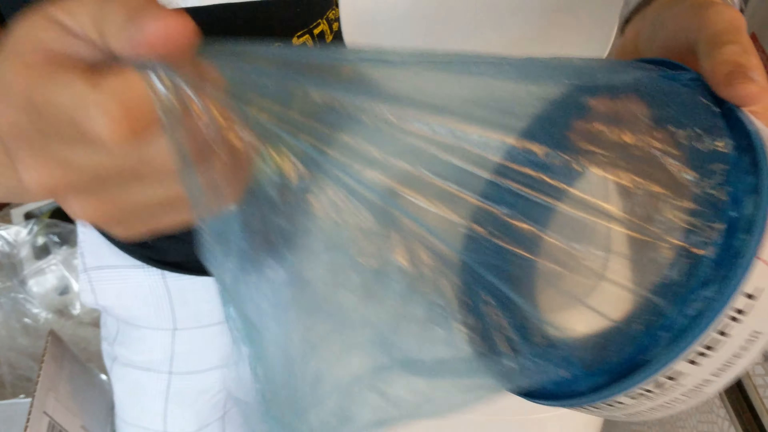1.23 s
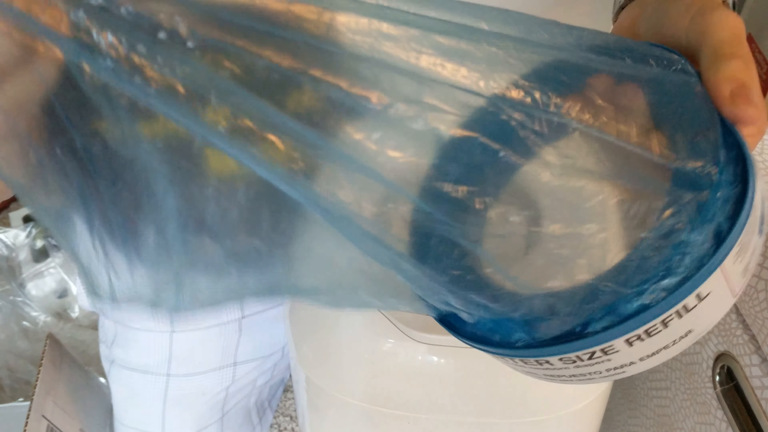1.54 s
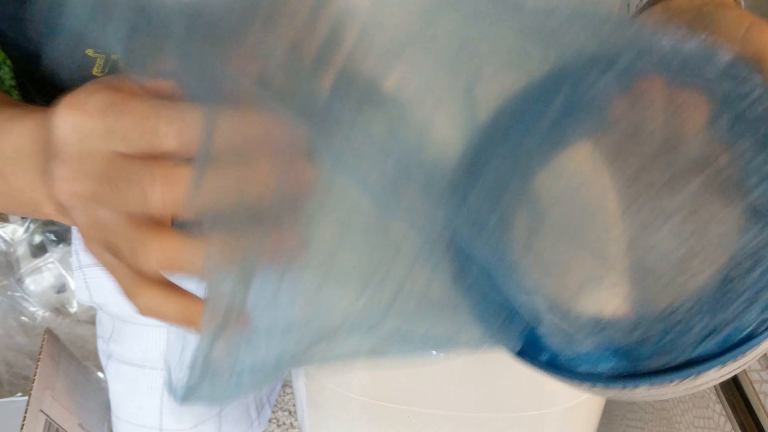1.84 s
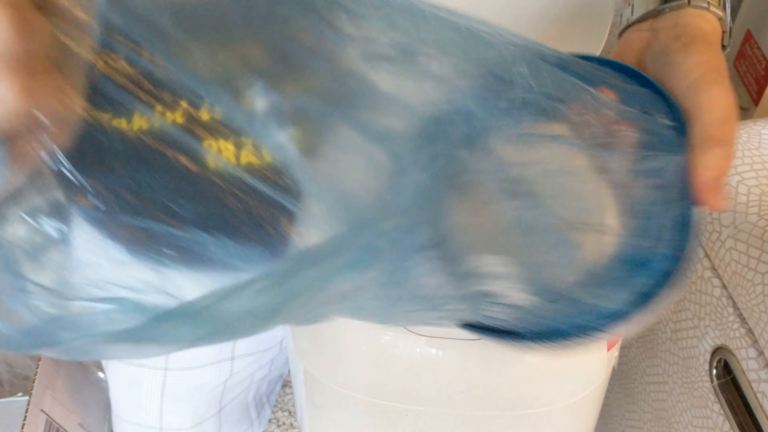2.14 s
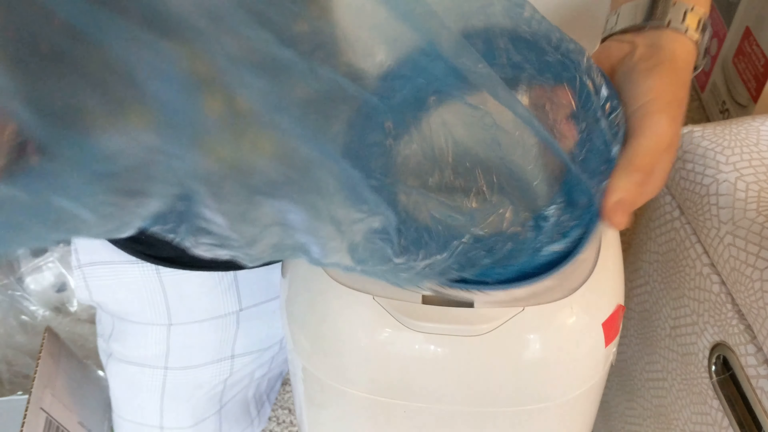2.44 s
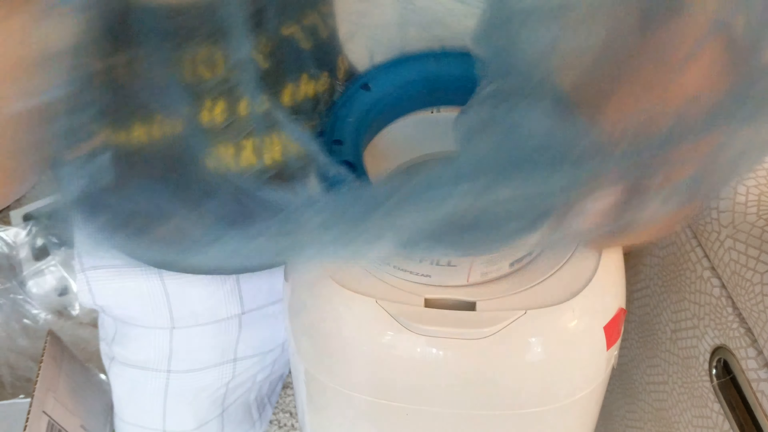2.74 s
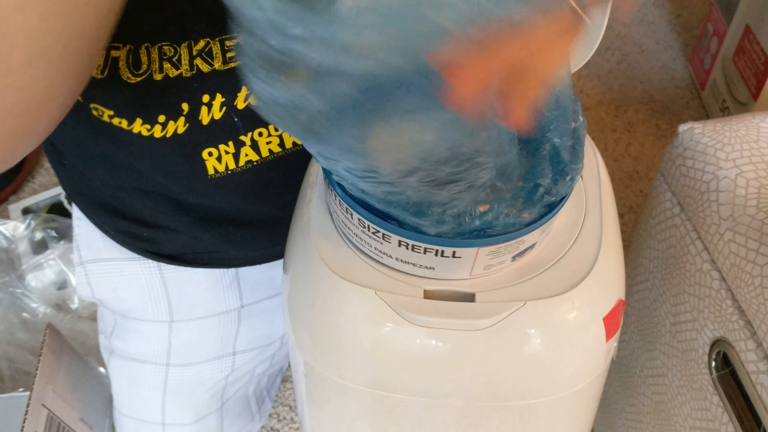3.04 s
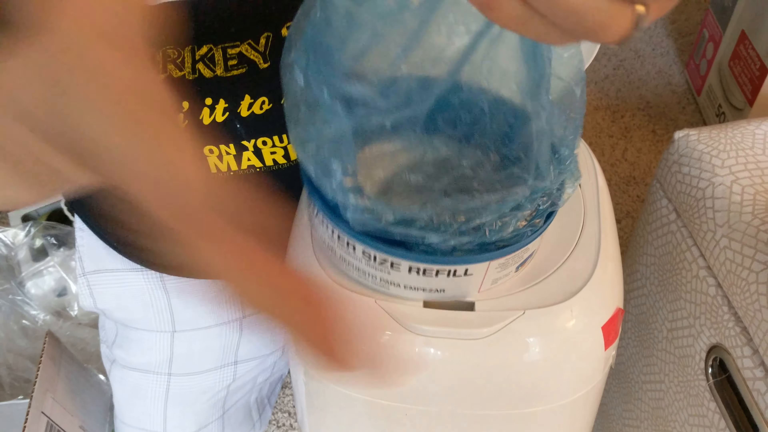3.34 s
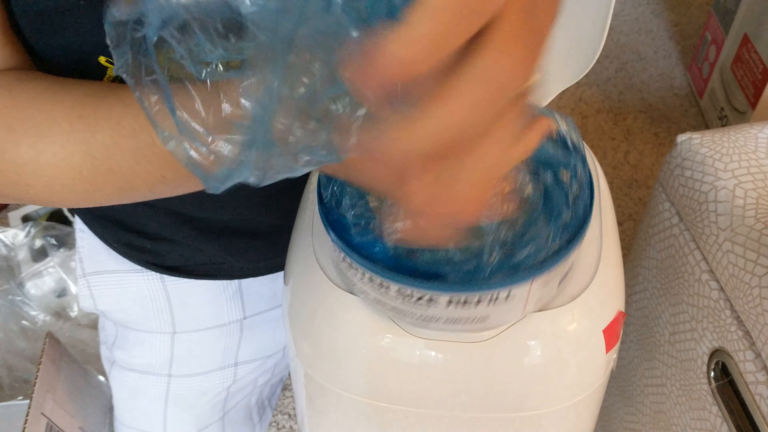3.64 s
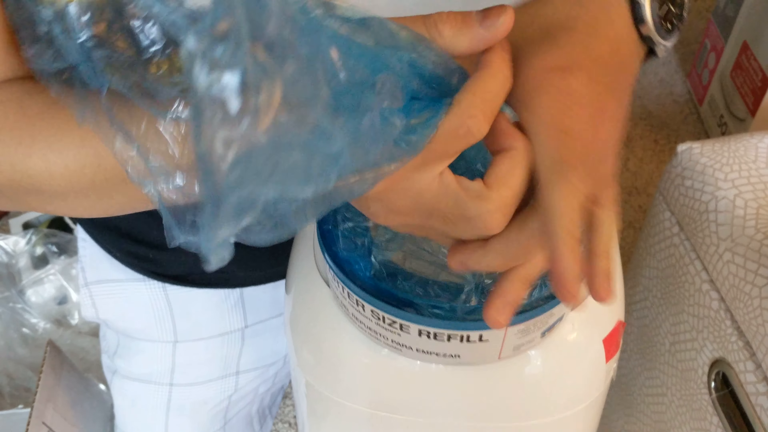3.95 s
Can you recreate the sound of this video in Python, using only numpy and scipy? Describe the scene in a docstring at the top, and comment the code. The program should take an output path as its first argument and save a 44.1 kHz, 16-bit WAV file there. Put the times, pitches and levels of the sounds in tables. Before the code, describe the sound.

A thin plastic bag crinkles and rustles in repeated tugs, close to the microphone in a small, quiet room. Creases snap now and then, and later a hard ring knocks a few times on a plastic pail.

```python
"""Thin plastic film crinkles as it is pulled from a bag refill ring, several times, close by in a small room.
The film buckles in thousands of tiny clicks, more of them the harder it is pulled, and flaps a little air
about. Now and then a stiff crease snaps. The hard ring knocks and scrapes in the hand and against a
plastic pail, whose hollow body thuds softly."""
import sys
import numpy as np
from scipy import signal
from scipy.io import wavfile
from scipy.ndimage import uniform_filter1d

SR = 44100
rng = np.random.default_rng(int(sys.argv[2]) if len(sys.argv) > 2 else 0)


def materialize(psi):
    """Save the field psi as 16-bit PCM at rate SR to the path in sys.argv[1].

    A 1-D psi becomes a single channel; in a 2-D psi each row is a channel.
    """
    bounded = np.clip(np.atleast_2d(psi).T, -1, 1)
    quanta = np.round(bounded * 32767).astype(np.int16)
    wavfile.write(sys.argv[1], SR, quanta)


N = 176400
TIME = np.arange(N) / SR
HALF_SECOND = SR // 2


def crinkle():
    """Pulled film buckles in clumps of tiny clicks, over the smooth hiss of sliding."""
    # How loud the film's crinkling is as it swells and fades: time_s, treble_db, middle_db
    loudness = [
        [(0.02, -52, -50), (0.036, -50, -48.5), (0.096, -48, -53), (0.1, -44.5, -49), (0.182, -34, -34),
         (0.19, -38.5, -40.5), (0.23, -38.5, -39.5)],
        [(0.24, -35.5, -48), (0.264, -36, -34), (0.272, -36.5, -43), (0.322, -32.5, -34), (0.38, -34.5, -43),
         (0.41, -38, -38), (0.435, -46, -54)],
        [(0.45, -41, -46.5), (0.516, -49.5, -49.5), (0.548, -52, -57.5), (0.646, -58.5, -62), (0.654, -52, -54),
         (0.66, -57.5, -61), (0.775, -64, -71)],
        [(0.785, -62.5, -62), (0.799, -49.5, -48), (0.837, -50, -58.5), (0.879, -44, -45.5),
         (1.003, -33.5, -36.5), (1.137, -38, -40), (1.16, -44, -46.5)],
        [(1.166, -36, -39.5), (1.188, -27.5, -30), (1.208, -38.5, -39), (1.232, -35.5, -44.5),
         (1.32, -43, -42.5)],
        [(1.335, -39, -38), (1.345, -39.5, -40), (1.359, -36.5, -45), (1.365, -33.5, -32.5),
         (1.433, -31.5, -34), (1.517, -42.5, -48), (1.542, -50, -53)],
        [(1.552, -41, -44.5), (1.608, -40, -42.5), (1.734, -46, -50.5), (1.74, -53, -63), (1.794, -47.5, -52),
         (1.8, -77, -71), (1.82, -74, -88)],
        [(1.86, -63, -61.5), (1.91, -51, -47), (1.928, -46, -50), (1.934, -44.5, -45.5), (2.052, -33, -34.5),
         (2.068, -35.5, -37.5), (2.132, -32, -34.5)],
        [(2.19, -43.5, -40.5), (2.216, -40, -44.5), (2.37, -30.5, -34), (2.444, -34.5, -38),
         (2.49, -45.5, -49.5), (2.506, -41.5, -44.5), (2.55, -53.5, -52)],
        [(2.59, -49, -42), (2.662, -50, -50.5), (2.704, -43, -49.5), (2.716, -41, -42.5), (2.758, -39, -47.5),
         (2.798, -50.5, -50), (2.845, -46.5, -49)],
        [(2.975, -68.5, -54.5), (3.021, -55, -64), (3.027, -52.5, -53), (3.065, -36, -50), (3.079, -49, -47),
         (3.091, -36.5, -43.5), (3.11, -41.5, -47.5)],
        [(3.13, -35.5, -39.5), (3.168, -36, -43), (3.176, -39.5, -37.5), (3.214, -37.5, -41.5),
         (3.23, -35.5, -40.5), (3.362, -44, -53), (3.385, -45, -58)],
        [(3.43, -44, -46), (3.446, -41.5, -54), (3.476, -39, -40.5), (3.55, -37, -38.5), (3.675, -42.5, -44.5)],
        [(3.785, -51.5, -49), (3.865, -49, -54.5), (3.889, -59, -50), (3.893, -52, -58), (3.951, -54, -55),
         (3.959, -49.5, -56), (4.0, -46, -46)],
    ]
    # The film's tone, from low to high: pitch_hz, level_db
    film_tone = [(150,-8),(260,-9),(400,-6),(600,-4.5),(820,-3),(1050,-2.5),(1400,-2.5),(1700,-1.5),(2300,-0.5),(3400,-1.6),(5000,-2.5),(8500,-6.5),(13000,-7.5),(16000,-8.5)]
    treble_db, middle_db = curves_over_time(loudness)
    full_pull_db, full_pull_clicks_per_s = -33, 9000
    chance = np.clip(full_pull_clicks_per_s * from_db(.8 * (treble_db - full_pull_db)) / SR, 1e-4, 1)
    happens = rng.random(N) < chance
    size_db = 2.5 * np.minimum(rng.exponential(1, N), 4.5)
    clump_db = 2.5 * drift(rate_hz=33)
    buckles = happens * from_db(size_db + clump_db) * rng.choice([-1, 1], N) / np.sqrt(chance)
    buckles /= np.sqrt(uniform_filter1d(buckles ** 2, size=1000) + 1e-2)   # even out the loudness
    out, power = np.zeros(N), 0
    for edges, hz in bands()[6:]:   # skip the deep bass
        colour_db = 4.5 * np.clip(rng.standard_normal(N), -2, 2)   # each click gets its own tone
        clicks = rms_one(buckles * from_db(colour_db))
        shivering = from_db(.5) * shiver(clicks, fade_s=.01)
        sliding = .49 * rng.standard_normal(N)
        sheet = rms_one(filtered(clicks + shivering + sliding, edges, "band"))
        treble_share = at_hz([(1370, 0), (7100, 1)], hz)
        level_db = treble_share * (treble_db + 2) + (1 - treble_share) * (middle_db + 4.5)
        gain = from_db(at_hz(film_tone, hz)) * np.sqrt(hz)
        out = gain * from_db(level_db) * sheet - out   # flipping the sign joins the bands without dips
        power += gain ** 2
    return out / np.sqrt(power)


def shiver(clicks, fade_s):
    """The sheet shivers after each click, making a short burst of fading noise."""
    energy_kept = from_db(-120 / (fade_s * SR))
    energy = signal.lfilter([1 - energy_kept], [1, -energy_kept], clicks ** 2 + 1e-18)
    return np.sqrt(energy) * rng.standard_normal(N)


def crease_snaps():
    """A stiff crease flips over with a click and a very short flutter."""
    # Single creases snapping: start_s, level_db, pitch_hz
    creases = [(.0355,-30,5000),(.128,-36,4000),(0.26,-17,3500),(.298,-18,2980),(.3235,-14,4440),(0.559,-33,6000),(0.615,-32.5,7000),(0.632,-39,7000),(.6535,-34.5,7000),(.674,-42,7040),(0.791,-34,7000),(0.805,-32,7000),(0.8035,-24.5,6000),(0.845,-26,5000),(0.886,-20,2000),(.917,-22,5000),(.947,-35,4000),(1.108,-26,4000),(1.169,-24,3500),(1.186,-32,3500),(1.333,-25,4000),(1.367,-32,2500),(1.3934,-16,3500),(1.425,-21,3000),(1.553,-28,6000),(1.727,-19.5,4900),(1.7905,-31,4900),(1.807,-28,3900),(1.8475,-27.5,12000),(1.8485,-24.5,9000),(1.937,-24,4960),(2.135,-18,4900),(2.581,-23,6000),(2.6665,-26.5,5970),(2.961,-32.5,4940),(3.026,-26.5,8000),(3.04,-26,6000),(3.123,-14,7000),(3.726,-17,5800),(3.7274,-24,7000),(3.779,-28,5500),(3.825,-34,5000),(3.98,-32,5000)]
    out = np.zeros(N)
    for start_s, level_db, hz in creases:
        flutter = from_db(1.5) * fading_noise(fade_s=.012)
        snap = filtered(signal.unit_impulse(HALF_SECOND) + flutter, [hz / 2, hz * 2], "band", order=1)
        add(out, start_s, from_db(level_db - 1.5) * snap / np.abs(snap).max())
    return out


def ring_hollow(film):
    """The hollow of the ring colours the sound of the tight film, until the film goes slack."""
    # Pitches the hollow makes louder or softer: pitch_hz, width_hz, boost_db
    resonances = [(302,52,-2.5),(585,160,3.5),(754,110,-2),(960,240,-0.5),(1200,200,-3),(1420,180,6.5),(1660,140,-1),(3330,1100,2)]
    tight = film
    for hz, width_hz, boost_db in resonances:
        b, a = signal.iirpeak(hz, hz / width_hz * from_db(boost_db / 2), fs=SR)
        tight = tight + (from_db(boost_db) - 1) * signal.lfilter(b, a, tight)
    slack_start_s, slack_length_s = 2, .19
    slack = np.clip((TIME - slack_start_s) / slack_length_s, 0, 1)
    return (1 - slack) * tight + slack * film


def knocks():
    """The hard ring hits with a push, a crack, a rattle, a boom and ringing."""
    # Each knock has its own loudness and brightness: start_s, level_db, brightness_hz, push_db
    hits = [(.181,-26,550,-40),(.299,-36,700,-30),(1.187,-26,550,-33),(2.142,-10.5,1400,-11),(2.1471,-18.5,2800,-30),(2.8629,-10,3530,-20),(2.8675,-15.5,1200,-16),(3.177,-22.5,1100,-27),(3.234,-30,1400,-32),(3.3974,-21.5,900,-39),(3.682,-18.5,2350,-29),(3.7353,-22.5,950,-25.5)]
    out = np.zeros(N)
    for start_s, level_db, brightness_hz, push_db in hits:
        click_and_rattle = signal.unit_impulse(HALF_SECOND) + fading_noise(fade_s=.013)
        crack = from_db(20) * filtered(click_and_rattle, 600, "high")
        boom = from_db(16) * filtered(fading_noise(fade_s=.096), [209, 320], "band")
        knock = filtered(crack + boom + plastic_ringing(), brightness_hz, "low")
        add(out, start_s, from_db(level_db) * knock - from_db(push_db) * wall_push())
    return out


def wall_push(pitch_hz=1000):
    """A firm hit pushes the plastic wall once: one pulse of pressure with a small dip on each side."""
    from_peak_squared = (np.pi * (pitch_hz * TIME[:HALF_SECOND] - .7)) ** 2
    return (1 - 2 * from_peak_squared) * np.exp(-np.minimum(from_peak_squared, 50))


def plastic_ringing():
    """The plastic rings briefly at its own pitches, in a slightly different mix at each touch."""
    # Natural tones of the ring and pail: pitch_hz, level_db, fade_s
    tones = [(267,-18,0.099),(454,-23,0.13),(625,-6.5,0.073),(833,0,0.021),(937,6,0.013),(1080,4.5,0.028),(1460,-14,0.041),(1570,3,0.023),(1900,-6,0.089),(2200,-22,0.064),(2470,-8,0.026),(3530,-29,0.032),(5300,-12,.03)]
    return sum((-1) ** k * from_db(level_db - 16 + rng.standard_normal()) * fading_tone(hz, fade_s)
               for k, (hz, level_db, fade_s) in enumerate(tones))


def pail_thuds(fade_s=.16, width_ratio=1.41):
    """Soft bumps make the hollow pail hum and rumble around a low pitch."""
    # Bumps on the pail: start_s, level_db, pitch_hz
    bumps = [(.001,-34.5,411),(.003,-38.5,197),(0.025,-39.5,213),(0.056,-38,102),(.90,-42,175),(1.206,-35,74),(2.064,-35.5,57.5),(2.521,-46.5,239),(2.57,-52,248),(2.862,-37,113),(3.008,-36.5,162),(3.010,-48.5,396),(3.683,-40,119),(3.705,-42.5,200),(3.836,-51.5,205)]
    out = np.zeros(N)
    for start_s, level_db, hz in bumps:
        hum = fading_tone(hz, fade_s)
        rumble = filtered(fading_noise(fade_s), [hz / width_ratio, hz * width_ratio], "band")
        thud = from_db(-3.5) * hum + from_db(-2.5) * np.std(hum) * rms_one(rumble)
        add(out, start_s, from_db(level_db) * thud)
    return out


def scrapes():
    """The ring rubs on film and pail: a gritty noise swells, fades and makes the plastic ring."""
    # Rubbing strokes: start_s, length_s, level_db
    strokes = [(2.268,0.23,-42.5),(2.499,0.017,-45),(2.705,0.017,-46.5),(2.812,.06,-46),(3.821,0.048,-56)]
    out = np.zeros(N)
    for start_s, length_s, level_db in strokes:
        swell = np.hanning(int(length_s * SR))
        ringing = plastic_ringing()
        grit = 2 * from_db(5.5) * signal.unit_impulse(HALF_SECOND)
        friction = swell * rng.standard_normal(len(swell))
        rub = signal.fftconvolve(friction, ringing / np.linalg.norm(ringing) + grit)
        rub = filtered(rub, [435, 1310], "band")
        add(out, start_s, from_db(level_db) * rub / np.std(rub[:len(swell)]))
    return out


def flapping_air():
    """The flapping film pushes air about in low puffs."""
    # How strongly the air moves as it swells and fades: time_s, level_db
    flaps = [
        [(0.0, -58), (0.304, -52), (0.334, -48), (0.446, -65), (0.558, -67), (0.592, -82), (0.774, -74),
         (0.78, -54)],
        [(0.8, -59), (0.84, -84), (1.008, -44), (1.15, -54), (1.224, -46), (1.302, -62), (1.412, -50),
         (1.83, -73)],
        [(1.85, -76), (1.952, -50), (2.014, -58), (2.058, -45), (2.168, -51), (2.246, -65), (2.3, -58)],
        [(2.33, -55), (2.38, -44), (2.404, -54), (2.502, -55), (2.58, -69), (2.6, -60), (2.716, -67),
         (2.84, -46)],
        [(2.95, -71), (3.03, -51), (3.14, -58), (3.178, -46), (3.332, -60.5), (3.73, -60), (3.926, -63),
         (4.0, -84)],
    ]
    # The deep tone of moving air: pitch_hz, level_db
    air_tone = [(25,-30),(50,-5),(70,0.5),(110,-3),(170,-4),(300,-24.5)]
    level_db, = curves_over_time(flaps)
    return from_db(level_db + 1.5) * shaped_noise(air_tone)


def room_echo(sound):
    """The small room adds a short, blurred echo whose treble dies first."""
    # How long the echo lasts: pitch_hz, fade_s
    echo_fades = [(100,0.96),(500,0.16),(1500,0.25),(4000,0.08),(12000,0.04)]
    tail = sum(filtered(fading_noise(at_hz(echo_fades, hz)), edges, "band") for edges, hz in bands())
    out = np.zeros(N)
    add(out, start_s=.005, sound=signal.fftconvolve(sound, tail)[:N])
    return out


def room_background():
    """A faint, steady, low noise fills the room."""
    # The tone of the quiet room: pitch_hz, level_db
    room_tone = [(25,1),(60,3.5),(150,-9.5),(500,-14),(2000,-16.5),(4300,-24.5),(6000,-38),(15000,-49)]
    return from_db(-64.5) * shaped_noise(room_tone)


def from_db(db):
    """Turn decibels into a number to multiply by."""
    return 10 ** (np.asarray(db) / 20)


def rms_one(sound):
    """Scale a sound so its average strength (rms) is 1."""
    return sound / np.sqrt(np.mean(sound ** 2) + 1e-20)


def at_hz(points, hz):
    """Read a table at any pitch, sliding between its rows by octaves."""
    pitches, values = np.transpose(points)
    return np.interp(np.log(hz), np.log(pitches), values)


def curves_over_time(tables):
    """Join lists of timed rows into one curve per column, with a value for every sample."""
    rows = np.vstack(tables)
    times, *columns = rows[np.argsort(rows[:, 0])].T
    return [np.interp(TIME, times, column) for column in columns]


def filtered(sound, hz, kind, order=2):
    """Keep the "low" part, the "high" part or one "band" of a sound."""
    sections = signal.butter(order, np.clip(hz, 10, SR / 2 - 100), kind, fs=SR, output="sos")
    return signal.sosfilt(sections, sound + 1e-18)


def drift(rate_hz):
    """A smooth random wobble, about 1 in size."""
    return rms_one(filtered(rng.standard_normal(N + SR), rate_hz, "low")[SR:])


def bands():
    """Split the range of hearing into 24 bands: ([low_hz, high_hz], centre_hz)."""
    edges = np.geomspace(22, 17500, 25)
    return [([low, high], np.sqrt(low * high)) for low, high in zip(edges, edges[1:])]


def shaped_noise(tone):
    """Steady noise of strength 1, with its bass and treble set by a table."""
    return rms_one(sum(from_db(at_hz(tone, hz)) * filtered(rng.standard_normal(N), edges, "band")
                       for edges, hz in bands()))


def fading_noise(fade_s):
    """A burst of noise with energy 1 that drops 60 dB in fade_s."""
    burst = rng.standard_normal(HALF_SECOND) * from_db(-60 * TIME[:HALF_SECOND] / fade_s)
    return burst / np.linalg.norm(burst)


def fading_tone(hz, fade_s):
    """A pure tone that drops 60 dB in fade_s."""
    t = TIME[:HALF_SECOND]
    return np.sin(2 * np.pi * hz * t) * from_db(-60 * t / fade_s)


def add(out, start_s, sound):
    """Mix a sound into out, beginning at start_s."""
    start = max(int(start_s * SR), 0)
    out[start:start + len(sound)] += sound[:N - start]


def scene():
    """Film, pail and moving air in the room, the same in both channels."""
    film = ring_hollow(crinkle() + crease_snaps())
    pail = knocks() + scrapes() + pail_thuds()
    air = flapping_air()
    echo = room_echo(from_db(-16.5) * film + from_db(-12) * pail)
    mono = film + pail + air + echo + room_background()
    return np.array([mono, mono])


def record(dry, lowest_hz=43, highest_hz=15750):
    """Soften the deepest bass and sharply cut the highest treble."""
    treble_cut = signal.ellip(12, .1, 80, highest_hz, fs=SR, output="sos")
    return signal.sosfilt(treble_cut, filtered(dry, lowest_hz, "high"))


dry = scene()
out = record(dry)
materialize(out)
```